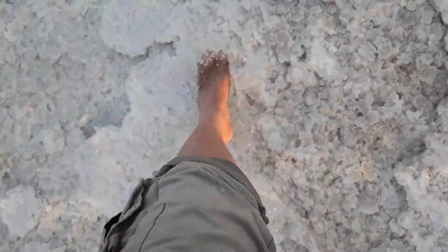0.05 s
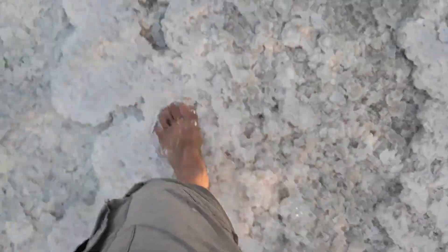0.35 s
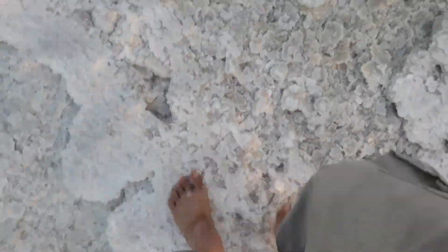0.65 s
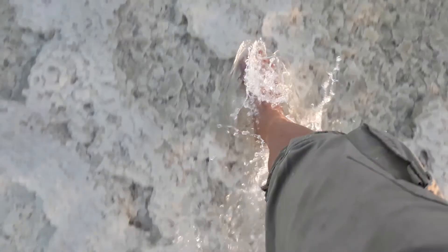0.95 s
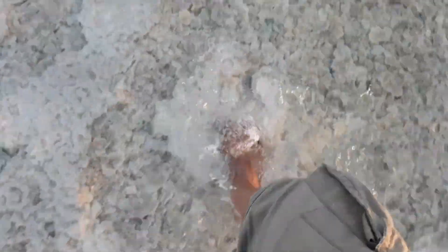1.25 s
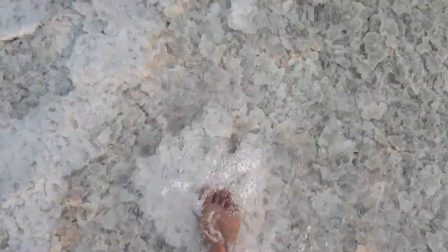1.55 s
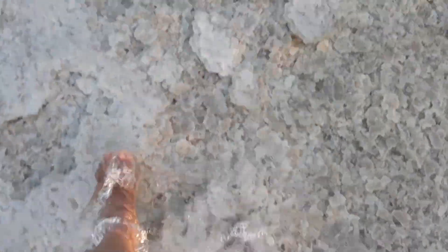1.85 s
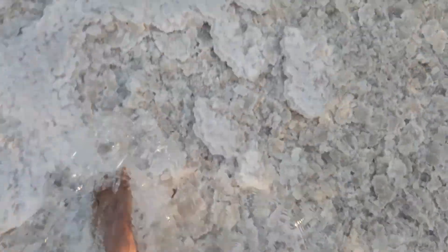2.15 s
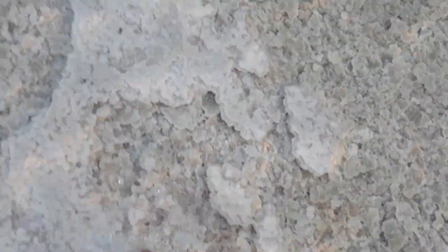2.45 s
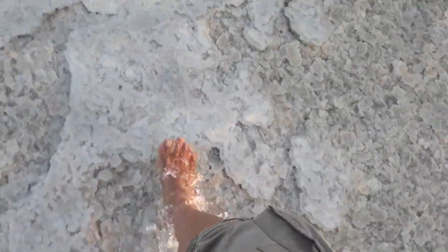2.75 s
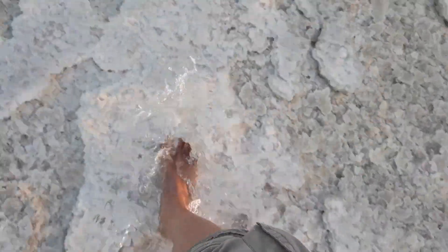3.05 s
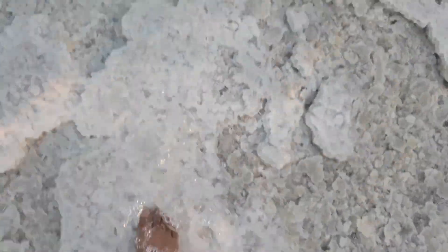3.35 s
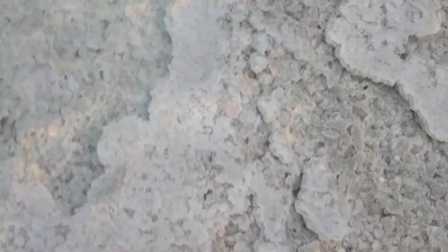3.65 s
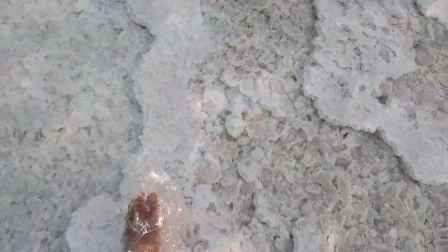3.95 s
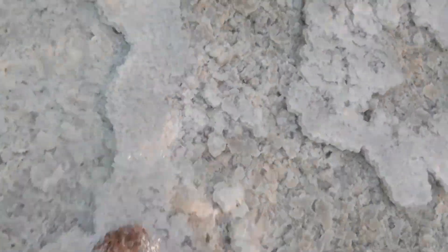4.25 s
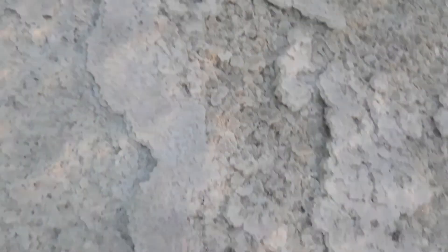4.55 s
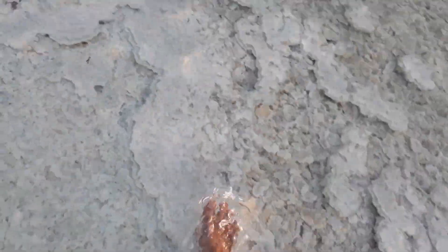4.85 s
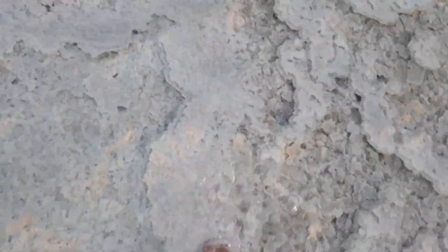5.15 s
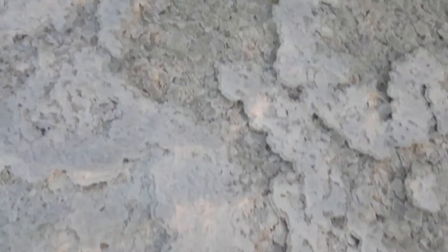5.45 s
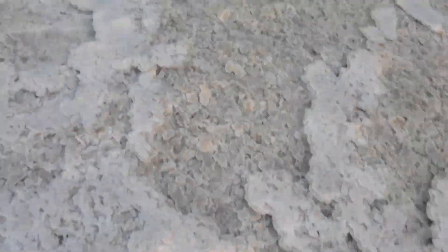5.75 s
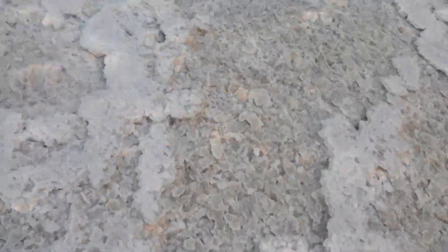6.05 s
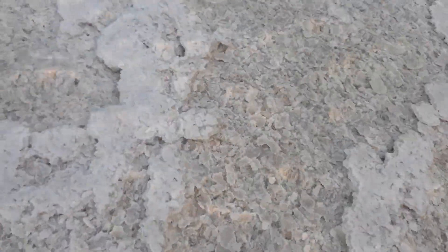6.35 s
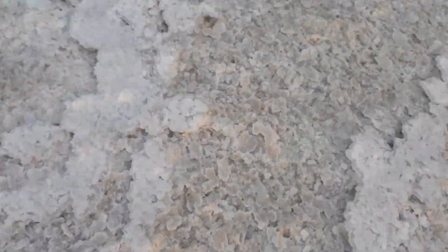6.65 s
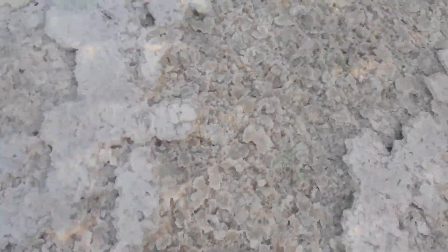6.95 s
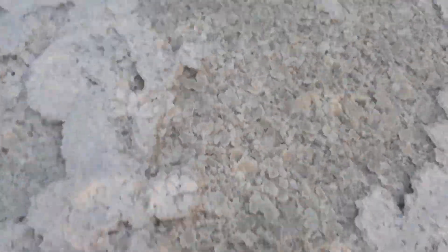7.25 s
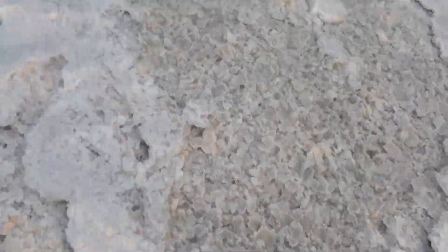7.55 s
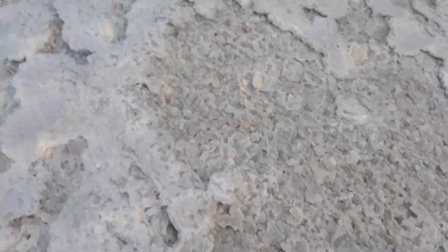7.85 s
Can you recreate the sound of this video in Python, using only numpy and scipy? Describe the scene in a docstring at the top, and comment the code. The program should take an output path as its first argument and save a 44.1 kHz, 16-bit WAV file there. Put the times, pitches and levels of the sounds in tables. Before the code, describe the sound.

Bare feet wade through ankle-deep water on an open salt flat, about one stride a second. Each step swells into a bubbly slosh with small slaps and a bright patter of spray. Wind rumbles and thumps on the close, hand-held microphone throughout, growing stronger in the second half and briefly distorting in the hardest gust, while the steps turn softer toward the end.

```python
"""Bare feet wade through ankle-deep brine over a salt crust, about one stride a second.
Each stride speeds up, sloshes and lands. It entrains air, which resonates as bubbles of rising pitch,
and throws spray, whose impacts patter on the surface; a faint hollow ring follows some footfalls.
Turbulent wind buffets the hand-held microphone and overloads it in the strongest gusts.
Behind it all lies the faint hush of the open flat."""
import sys
import numpy as np
from scipy import signal
from scipy.fft import rfft, irfft, next_fast_len
from scipy.io import wavfile
from scipy.ndimage import uniform_filter1d

SR = 44100
rng = np.random.default_rng(int(sys.argv[2]) if len(sys.argv) > 2 else 0)


def dump_mix(stems):
    """Bounce the given channels to the path in sys.argv[1] as a 16-bit WAV at rate SR."""
    frames = np.atleast_2d(stems).T  # one column per channel
    limited = np.clip(frames, -1, 1)  # hard clip at full scale
    pcm = np.round(limited * 32767).astype(np.int16)
    wavfile.write(sys.argv[1], SR, pcm)


N = 348390
TIME = np.arange(N) / SR

# Levels in the tables are relative: each source applies its own gain.
# Spectra of the noise sources: f/Hz, spectral level/dB
AIR_SPECTRUM = [(30, 21), (300, 3.5), (600, 0.5), (1000, 5), (2000, -6.5), (4000, -52), (6800, -35),
                (9300, -9), (16000, -45)]
RUMBLE_SPECTRUM = [(20, -1), (40, -18.5), (60, -5.5), (100, 3), (140, 2.5), (200, -6), (300, -27),
                   (500, -36.5), (1000, -71)]
BUFFET_SPECTRUM = [(40, -61), (110, -3.5), (170, 3), (250, -0.5), (330, -5), (450, -12.5), (620, -25.5),
                   (1000, -49.5), (2000, -56), (5000, -90.5)]
TEARING_SPECTRUM = [(200, -19), (450, 17.5), (850, 3), (1300, -11), (2500, -33), (5000, -72)]
SPRAY_SPECTRUM = [(1000, 3.5), (2500, 11.5), (4200, 8), (5500, -3.5), (6900, -8.5), (8000, -3.5), (9200, 5),
                  (11000, -1), (13000, 2.5), (16000, 1.5)]
CHURN_SPECTRUM = [(250, -30.5), (500, -9.5), (900, -5), (1500, -1.5), (2500, 0.5), (3600, -11),
                  (5000, -19.5), (6800, -29), (10000, -45)]
# Strength of the breeze: t/s, level/dB
BREEZE_LEVELS = [(0.0, -41), (0.1, -46.5), (0.315, -26.5), (0.975, -36.5), (1.02, -26.5), (1.315, -29.5),
                 (1.5, -38), (1.855, -32.5), (1.98, -43), (2.365, -23.0), (2.65, -30.5), (3.275, -26.5),
                 (4.315, -25.5), (4.555, -22), (4.76, -24.5), (4.985, -40.0), (5.315, -26), (5.77, -25),
                 (6.165, -24.5), (6.765, -45.5), (7.01, -59), (7.175, -40), (7.225, -34), (7.9, -39)]
# Gusts: t/s, duration/s, level/dB, swell from start to end/dB,
# extra tearing as the flow meets the microphone port more squarely/dB
WIND_GUSTS = [(0.283, 0.036, -23.5, 11, 3), (0.525, 0.19, -32, -15, 10), (1.007, 0.078, -44, 4.0, -11),
              (1.264, 0.032, -19.4, -8.5, -12), (2.077, 0.022, -23.5, -6, 14), (2.214, 0.035, -34, -2.0, 6),
              (2.344, 0.063, -20, -5.5, 3.0), (2.449, 0.057, -20, 4.5, 7.5), (2.92, 0.07, -27.5, 5.5, -6),
              (3.128, 0.02, -22.5, -9.5, -6), (3.231, 0.16, -20.5, 2, 3.5), (3.479, 0.13, -20, -3, 7.5),
              (3.686, 0.044, -29, 8, -17), (3.805, 0.19, -30.5, -15, 5), (4.027, 0.23, -18, 7, 0.5),
              (4.282, 0.063, -11.5, 4, 2), (4.581, 0.21, -15.5, -5, 7), (5.142, 0.027, -24.5, 15, 0),
              (5.244, 0.075, -19.5, -3.5, 6), (5.337, 0.218, -20.0, 4, -8), (5.578, 0.258, -14.5, -7.5, -5),
              (5.872, 0.03, -7, 1, -16), (5.937, 0.204, -16.5, -6.5, 2.5), (6.174, 0.14, -15.5, -3.5, -3.5),
              (6.355, 0.18, -8.5, 5, 5), (6.598, 0.2, -15.5, 8.0, -1), (7.0, 0.205, -18.5, 2.0, 4.0),
              (7.256, 0.049, -20, 1, 9.5), (7.347, 0.035, -16.5, 9, 5.5), (7.485, 0.1, -21, 10.5, -1),
              (7.674, 0.16, -27.5, 11, -13)]
# Strong eddies striking the microphone: t/s, level/dB, f/Hz
STRONG_EDDIES = [(0.314, -14, 115), (1.01, -9, 101), (1.109, -9, 138), (2.319, -6, 130), (2.341, -3.5, 158),
                 (2.378, -5, 238), (2.496, -6.5, 216), (2.511, -10, 233), (3.1, -6.5, 113.5),
                 (3.213, -11, 294), (3.246, -5.5, 176), (3.277, -6, 165), (3.321, -10.5, 300),
                 (3.468, -15.5, 258), (4.204, -2.5, 172), (4.297, -8.5, 204), (4.614, -6.5, 123),
                 (4.645, -1.5, 249), (4.685, -3.5, 200), (4.755, -6.5, 260), (5.114, -24, 294),
                 (5.246, -10, 264), (5.304, -8, 123.6), (5.589, -4, 315), (5.774, -3, 221),
                 (6.415, -14, 260), (6.447, -2, 463), (6.465, -7.5, 870), (6.481, -5, 950),
                 (6.492, 3.5, 242), (6.515, 4.5, 235), (7.366, -6.5, 176), (7.38, -10, 152)]
# Footfalls that leave a hollow ring: t/s, level/dB
RINGING_FOOTFALLS = [(2.187, -34), (3.137, -40.5), (5.068, -64)]
# Modes of that ring: f/Hz, level/dB, decay time/s
RING_MODES = [(738, -2.5, 0.056), (1295, -6, 0.02), (1664, -8.5, 0.045), (2498, -9, 0.013),
              (2580, -5, 0.02), (3850, -17, 0.035)]
# Single drops striking the surface: t/s, level/dB, f/Hz
NEAR_DROPS = [(0.046, -32, 8100), (0.1332, -35.5, 8560), (1.1726, -21, 12400), (2.066, -19, 9700),
              (3.1353, -17, 11800), (3.5571, -24.5, 9450), (4.127, -26, 9500), (4.6273, -26, 13200),
              (4.72, -25, 11000), (5.0685, -24, 9800), (5.6414, -23, 9350), (5.8753, -22.5, 9700),
              (7.285, -36, 9640), (7.3307, -32, 9050)]
# Lumps of thrown water landing: t/s, level/dB, f/Hz
WATER_SLAPS = [(0.5192, -22, 1410), (0.757, -14, 2380), (0.8778, -27, 2330), (1.139, -14, 2570),
               (1.196, -11, 1510), (1.208, -10.5, 2400), (2.1003, -12, 2540), (2.1866, -8.5, 1380),
               (2.5113, -12.5, 2600), (2.935, -13, 1600), (3.109, -16.5, 1600), (3.125, -14, 2500),
               (3.1353, -11, 2900), (3.6105, -13, 2510), (4.061, -16.5, 2610), (4.101, -18, 2420),
               (4.4029, -25, 1440), (4.79, -11, 2740), (4.8319, -11, 2780), (4.873, -14.5, 2930),
               (5.0698, -25.5, 2340), (5.781, -16, 2300), (5.877, -15, 2420), (6.129, -15.5, 1700),
               (6.174, -16.5, 2120), (6.757, -23, 1960), (7.284, -31, 2300), (7.412, -24, 2220),
               (7.418, -29, 4050), (7.6485, -35, 1490)]
# Large bubbles: t/s, level/dB, f/Hz, decay time/s, fractional rise of f per decay time
LARGE_BUBBLES = [(0.034, -35, 940, 0.021, .2), (0.427, -33.5, 2300, 0.0039, 0.032),
                 (0.541, -13, 1950, 0.0054, 0.14), (0.709, -10, 2190, 0.0025, 0.019),
                 (0.864, -7, 2480, 0.0023, 0.16), (0.879, -5, 2310, 0.0022, 0.1),
                 (1.068, -8, 520, 0.0099, 0), (1.141, -10, 1430, 0.0041, 0.49),
                 (1.145, -6, 465, 0.0051, 0.018), (1.302, -15, 2400, 0.0014, 0.02),
                 (1.483, -18.5, 1147, 0.0088, 0.04), (1.613, -11, 902, 0.0053, 0.21),
                 (1.687, -22.5, 630, 0.012, 0.43), (1.729, -13, 1010, 0.0055, 0.016),
                 (1.799, -5, 3550, 0.0013, 0.084), (1.858, -16.5, 550, 0.0093, .05),
                 (2.001, -9.5, 1710, 0.0036, 0.097), (2.031, -11.5, 3580, 0.0021, 0),
                 (2.134, -10.5, 3270, 0.0014, .05), (2.189, -20, 1220, 0.0053, 0.072),
                 (2.545, -9, 1540, 0.003, 0.041), (2.593, -6.5, 2370, 0.0013, 0.041),
                 (2.612, -18, 1030, 0.0082, 0), (2.727, -3, 1250, 0.0024, 0.31),
                 (2.836, -13, 2250, 0.0043, 0.056), (2.78, -13, 784, 0.006, 0.035),
                 (2.89, -18, 865, 0.0068, 0.063), (2.93, -17, 1510, 0.0047, 0.079),
                 (3.039, -19, 1210, 0.0069, 0.061), (3.343, -16, 890, 0.0096, 0.15),
                 (3.559, -13, 1720, 0.0024, .09), (3.808, -12.5, 1320, 0.0035, 0.12),
                 (3.951, -4, 2880, 0.00065, 0.024), (4.34, -16, 2350, 0.0037, .13),
                 (4.404, -10.5, 1170, 0.001, 0.048), (4.499, -10.5, 2650, 0.0018, 0.041),
                 (4.626, -9, 1570, 0.0023, 0), (4.829, -13.5, 1945, 0.012, 0.3),
                 (4.979, -30, 590, 0.017, 0.22), (5.027, -19, 2420, 0.0022, .06),
                 (5.069, -23, 2260, 0.0023, 0), (5.709, -9, 1820, 0.0021, .28),
                 (5.774, -16, 1470, 0.0092, 0.51), (5.913, -22.5, 1280, 0.0077, 0.11),
                 (5.988, -19, 2110, 0.0049, 0.13), (6.546, -26, 1150, 0.0062, 0.52),
                 (6.878, -13.5, 1160, 0.0012, .16), (7.071, -22.5, 2840, 0.0026, .05),
                 (7.65, -22.5, 1440, 0.0027, 0.046), (7.871, -13.5, 1180, 0.0019, .11)]
# Water piling up and breaking within a stride: t/s, extra churn/dB, extra spray/dB
BREAKING_SLOSHES = [(0.545, 0, -12.5), (0.738, 7, -2.5), (0.875, 5, 3), (1.089, -5, 4.5), (1.204, 4, 5.5),
                    (1.68, 0, -0.5), (1.79, 3, 4.5), (2.08, -4, 3.5), (2.585, 6, 5), (2.73, 1.5, 2.5),
                    (2.93, -1.5, 5.5), (3.6, -3, 7.5), (3.771, 8, 6), (3.941, 6, 6.5), (4.101, 10.5, -1),
                    (4.626, 3, 2.5), (4.835, -3.5, 10), (5.45, -1, 5.5), (5.665, 7.5, 2), (5.785, -1.5, 1),
                    (6.265, 5.5, -4.5), (6.49, -1, -4.5), (6.886, 2, 9)]
# Swings of a leg: t/s, duration/s, fraction of the duration at top speed, churn level/dB,
# spray level/dB, set-off/dB re top, wake/dB re top, excess of small drops over large/dB
LEG_SWINGS = [(-0.44, 0.46, 0.57, -39.5, -57, -8, -30, 12.5),
              (0.549, 0.67, 0.66, -28.5, -42.5, -8, -14.5, -12.5),
              (1.492, 0.66, 0.48, -31.5, -41.5, -12, -13.5, -8.5),
              (2.465, 0.47, 0.85, -28.5, -43.5, -8.5, -9, -12),
              (3.306, 0.67, 0.77, -34.5, -45.5, -6.5, -4, -9.5),
              (4.347, 0.507, 0.75, -31, -45, -7.5, -14, -7), (5.388, 0.44, 0.58, -36, -44, -4.5, -13, -5),
              (6.059, 0.48, 0.41, -34.5, -47.5, -12, -30.5, -1.5),
              (6.764, 0.48, 0.51, -42.5, -51, -1.5, -15, -7.5),
              (7.666, 0.4, 0.51, -39, -62.5, -11, -12, 7.5)]

GUST_RISE_S, GUST_FALL_S = 0.013, 0.011
PUSH_S, STOP_S = 0.22, 0.072  # the water gets going; it drops back as the foot lands
REST_DB, WAKE_S, SETTLE_DB = -79.5, 0.28, -14.5  # the wake has settled by SETTLE_DB after WAKE_S
SLOSH_S = 0.021  # half-width of a slosh


def gain_of(db):
    """Amplitude ratio of a level in decibels."""
    return 10 ** (np.asarray(db) / 20)


def unit_rms(x):
    """Normalisation to rms 1."""
    return x / np.sqrt(np.mean(x ** 2) + 1e-20)


def steadied(x, span_s):
    """Division by the running rms: slow swells go, the fine grain stays."""
    size = max(int(span_s * SR), 8)
    power = uniform_filter1d(uniform_filter1d(x ** 2, size), size)
    return x / np.sqrt(abs(power) + 1e-4 * np.mean(x ** 2))


def glide(events, column):
    """Linear interpolation of a column between the midpoints of events."""
    rows = np.asarray(events)
    return np.interp(TIME, rows[:, 0] + rows[:, 1] / 2, rows[:, column])


def level_at(spectrum, hz):
    """Spectral level in dB, interpolated over log frequency."""
    f, db = np.transpose(spectrum)
    return np.interp(np.log(hz + 1), np.log(f), db)


def coloured(x, spectrum, size=4096):
    """Minimum-phase filtering: being causal, it keeps the sharp front of a click."""
    log_gain = np.log(gain_of(level_at(spectrum, abs(np.fft.fftfreq(size, 1 / SR)))))
    response = np.exp(np.conj(signal.hilbert(log_gain)))
    taps = np.fft.ifft(response).real[:size // 2]
    return signal.oaconvolve(x, taps)[:N]


def wander(cutoff_hz):
    """Random fluctuation: low-passed noise of rms 1."""
    rolloff = 1 + (np.fft.rfftfreq(N, 1 / SR) / cutoff_hz) ** 4
    return unit_rms(irfft(rfft(rng.standard_normal(N)) / rolloff, N))


def impacts(per_s, spread_db):
    """A Poisson train of clicks of either sign: many small, a few large."""
    size = gain_of(spread_db * np.minimum(rng.exponential(1, N), 4))
    return size * rng.choice([-1, 1], N) * (rng.random(N) < per_s / SR)


def add(mix, start_s, sound):
    """Superposition of a sound on the mix."""
    part = mix[max(round(start_s * SR), 0):][:len(sound)]
    part += sound[:len(part)]


def air(level_db=-55):
    """Stationary ambient noise: the hush of the open flat."""
    return gain_of(level_db) * unit_rms(coloured(rng.standard_normal(N), AIR_SPECTRUM))


def gust_envelope():
    """Gusts rise and collapse exponentially; being incoherent, they add in power."""
    power = np.zeros(N)
    for start, length, db, swell_db, _ in WIND_GUSTS:
        t = np.arange(-5 * GUST_RISE_S, length + 5 * GUST_FALL_S, 1 / SR)
        edges = np.exp(np.minimum(t, 0) / GUST_RISE_S - np.maximum(t - length, 0) / GUST_FALL_S)
        strength = gain_of(db + swell_db * (np.clip(t / length, 0, 1) - .5))
        add(power, start + t[0], (edges * strength) ** 2)
    return np.sqrt(power)


def eddies(trim_db=-2, cycles=0.71, snap=0.86):
    """A strong eddy is a heavily damped pressure oscillation, steepest at its front."""
    out, t = np.zeros(N), np.arange(2048) / SR
    for start, db, hz in STRONG_EDDIES:
        age = t * hz / cycles
        phase = 2 * np.pi * cycles * (age + snap * (1 - np.exp(-age)))
        pulse = age * np.exp(-1.6 * age) * np.sin(phase)
        add(out, start, gain_of(db + trim_db) * pulse / abs(pulse).max())
    return out


def wind(sway_db=4.0, flutter_db=2.5, overload=1.7, steepness=1.815, tearing_db=-10):
    """Turbulence: large eddies rumble, small ones buffet, pressure peaks tear at the port and crackle."""
    breeze = gain_of(np.interp(TIME, *np.transpose(BREEZE_LEVELS)))
    gusts = gust_envelope()
    flutter = wander(24)  # shakes rumble and buffet alike
    swaying = coloured(rng.standard_normal(N), RUMBLE_SPECTRUM) * gain_of(sway_db * flutter)
    rumble = steadied(swaying, 0.25) * np.hypot(gain_of(3.0) * breeze, gain_of(-11) * gusts)
    lumps = coloured(impacts(per_s=600, spread_db=3.16), BUFFET_SPECTRUM) * gain_of(flutter_db * flutter)
    buffet = steadied(lumps, 0.025) * np.hypot(gain_of(-4) * breeze, gain_of(0.5) * gusts) + eddies()
    envelope = abs(signal.hilbert(buffet, next_fast_len(N))[:N])
    pressure = overload * np.tanh(envelope / overload)
    tearing = unit_rms(coloured(rng.standard_normal(N), TEARING_SPECTRUM)) * pressure ** steepness
    return rumble + buffet + gain_of(glide(WIND_GUSTS, column=4) + tearing_db) * tearing


def hollow_ring():
    """Damped modes ring on faintly after some footfalls."""
    out, t = np.zeros(N), np.arange(SR // 2) / SR
    ring = sum(gain_of(db) * np.exp(-t / decay) * np.sin(2 * np.pi * hz * t)
               for hz, db, decay in RING_MODES)
    for start, db in RINGING_FOOTFALLS:
        add(out, start, gain_of(db) * ring)
    return out


def splat(hz, width_hz, decay_s, size=1024):
    """Impact of water on water: a damped band of noise with a sharp front and a peak of 1."""
    t, f = np.arange(size) / SR, np.fft.rfftfreq(size, 1 / SR)
    band = 1 / (1 + ((f - hz) / width_hz) ** 4)
    noise = irfft(band * np.exp(2j * np.pi * rng.random(len(f))))
    burst = noise * np.exp(-t / decay_s) * (1 - np.exp(-4 * hz * t))
    return burst / abs(burst).max()


def patter(clicks, low_hz, high_hz, breadth, cycles, count=24):
    """Drop size sets the pitch and decay of each impact: small drops sound higher and tend to die sooner."""
    size_class, out = rng.integers(0, count, N), np.zeros(N)
    for k, hz in enumerate(np.geomspace(low_hz, high_hz, count)):
        decay = cycles / np.sqrt(hz * 2000) * 2 ** (2 * rng.random() - 1)
        drop = splat(hz, breadth * hz, decay, size=512)
        drop = drop / np.linalg.norm(drop) * np.sqrt(hz)
        out += signal.oaconvolve(clicks * (size_class == k), drop)[:N]
    return out


def drops(trim_db=-1):
    """The brief impact of a near drop radiates a bright tick."""
    out = np.zeros(N)
    for start, db, hz in NEAR_DROPS:
        add(out, start, gain_of(db + trim_db) * splat(hz, width_hz=2300, decay_s=0.00092))
    return out


def slaps(trim_db=-2, crack_db=-14):
    """The impact of a lump of water radiates a broadband crack and a hollow smack."""
    out = np.zeros(N)
    for start, db, hz in WATER_SLAPS:
        smack = splat(hz, width_hz=1300, decay_s=0.0028)
        crack = gain_of(crack_db) * splat(7500, width_hz=15000, decay_s=0.00012)
        add(out, start, gain_of(db + trim_db) * (smack + crack))
    return out


def spray(level_db, trim_db=6.0, peak_per_s=3000, mist=0.57, flurry_db=1.3, split_hz=8500):
    """Shot noise of falling drops: their rate grows with the level, in flurries over a fine mist."""
    rate = peak_per_s * gain_of(0.31 * (level_db - level_db.max()))
    shower = unit_rms(patter(impacts(rate, spread_db=5.5), 2570, 14000, breadth=0.19, cycles=2.4))
    haze = mist * unit_rms(np.sqrt(rate)) * rng.standard_normal(N)
    flurries = unit_rms(gain_of(flurry_db * wander(68)))
    falling = steadied(coloured(shower + haze, SPRAY_SPECTRUM), 0.047) * flurries
    large_drops = signal.sosfiltfilt(signal.butter(2, split_hz, fs=SR, output="sos"), falling)
    small_drops = falling - large_drops
    fineness = gain_of(glide(LEG_SWINGS, column=7) / 2)
    return gain_of(level_db + trim_db) * (large_drops / fineness + small_drops * fineness)


def bubble(hz, decay_s, rise):
    """Trapped air is a damped resonator whose frequency climbs as it nears the surface."""
    age = np.arange(int(5 * decay_s * SR)) / (decay_s * SR)  # in decay times
    phase = 2 * np.pi * hz * decay_s * age * (1 + rise * age / 2)
    return (1 - np.exp(-6 * age)) * np.exp(-age) * np.sin(phase)


def plops(trim_db=-3):
    """Resonances of single large bubbles stand out of the cloud."""
    out = np.zeros(N)
    for start, db, hz, decay, rise in LARGE_BUBBLES:
        add(out, start, gain_of(db + trim_db) * bubble(hz, decay, rise))
    return out


def churn(level_db, trim_db=1.5, wash_db=-10.5, spread_db=3.5, cycles=4.44, rise=0.0623, count=14000):
    """Air entrainment: the shin folds under a cloud of bubbles, amid the patter of tearing water."""
    when, chance, pitch, life, climb, size = rng.random((count, 6)).T
    hz = 400 * (5200 / 400) ** (pitch ** .8)  # small bubbles outnumber large ones
    decay = cycles / hz * (hz / 2000) ** 0.44 * 5 ** (life - .5)
    amplitude = gain_of(level_at(CHURN_SPECTRUM, hz) - spread_db * np.log(size * 0.79 + 0.037))
    pitch_rise = 2 * rise * climb ** 2  # only the few near the surface climb much
    density = gain_of(0.3 * (level_db - level_db.max()))  # a harder push traps more bubbles
    cloud = np.zeros(N)
    for k in np.flatnonzero(chance < density[(when * N).astype(int)]):
        add(cloud, when[k] * N / SR, amplitude[k] * bubble(hz[k], decay[k], pitch_rise[k]))
    tearing = patter(impacts(per_s=2400, spread_db=3.25), 500, 4600, breadth=0.33, cycles=3.8)
    wash = gain_of(wash_db) * unit_rms(coloured(tearing, CHURN_SPECTRUM))
    return gain_of(level_db + trim_db) * steadied(steadied(cloud, 0.15) + wash, 0.044)


def sloshing(column):
    """Breaking water: each slosh adds a bell-shaped hump or dip to the level in dB."""
    out, t = np.zeros(N), np.arange(-3 * SLOSH_S, 3 * SLOSH_S, 1 / SR)
    for slosh in BREAKING_SLOSHES:
        add(out, slosh[0] + t[0], slosh[column] * np.exp(-(t / SLOSH_S) ** 2))
    return out


def swing(start, length, fastest, set_off_db, wake_db, landing_db=-3.0):
    """Amplitude follows the leg: it sets off, speeds up, slows and lands; the wake dies ever faster."""
    top, end = start + np.clip(fastest, .05, .95) * length, start + length
    times = [start - PUSH_S, start, top, end, end + STOP_S]
    db = np.interp(TIME, times, [REST_DB, set_off_db, 0, landing_db, wake_db])
    return gain_of(db + SETTLE_DB * np.clip((TIME - end) / WAKE_S, 0, 10) ** 2)


def wading(calm_db=-68, drizzle_db=-70, spray_lag=0.035, spray_onset_db=-9.5):
    """Strides add in power, giving the levels in dB of the churn and of the spray, which builds later."""
    churn_power, spray_power = gain_of(calm_db) ** 2, gain_of(drizzle_db) ** 2
    for start, length, fastest, churn_db, spray_db, set_off_db, wake_db, _ in LEG_SWINGS:
        push = swing(start, length, fastest, set_off_db, wake_db)
        throw = swing(start, length, fastest + spray_lag, set_off_db + spray_onset_db, wake_db)
        churn_power += (gain_of(churn_db) * push) ** 2
        spray_power += (gain_of(spray_db) * throw) ** 2
    return (10 * np.log10(churn_power) + sloshing(column=1),
            10 * np.log10(spray_power) + sloshing(column=2))


def scene(clump_db=2.0):
    """Superposition of water at the feet, wind at the microphone and ambient noise."""
    churn_db, spray_db = wading()
    clumps = unit_rms(gain_of(clump_db * wander(42)))  # water breaks and lands in lumps
    water = clumps * (churn(churn_db) + spray(spray_db)) + plops() + slaps() + drops() + hollow_ring()
    return (water + wind() + air())[None]


def record(dry, ceiling=0.92, low_cut_hz=46, high_cut_hz=15950):
    """Soft saturation rounds the largest peaks; band limiting sheds the deepest bass and top treble."""
    rounded = dry / (1 + (dry / ceiling) ** 4) ** (1 / 4)
    thinned = signal.sosfilt(signal.butter(3, low_cut_hz, "high", fs=SR, output="sos"), rounded)
    low_pass = signal.firwin(511, high_cut_hz, window=("kaiser", 9), fs=SR)
    return signal.oaconvolve(np.clip(thinned, -1, 1), low_pass[None], "same")


dry = scene()
out = record(dry)
dump_mix(out)
```